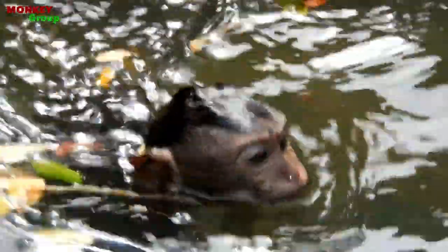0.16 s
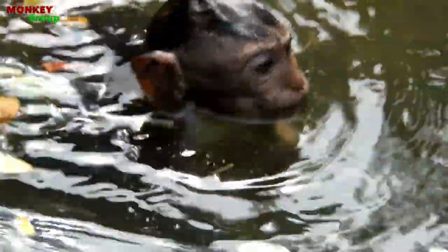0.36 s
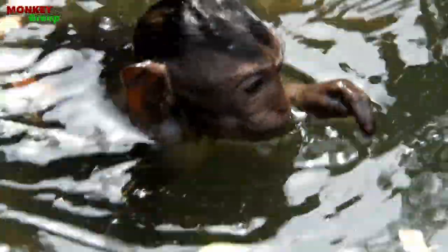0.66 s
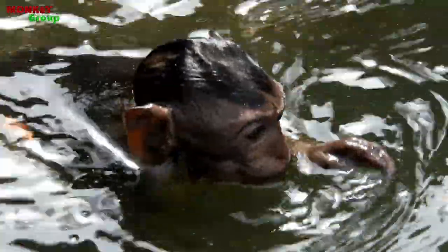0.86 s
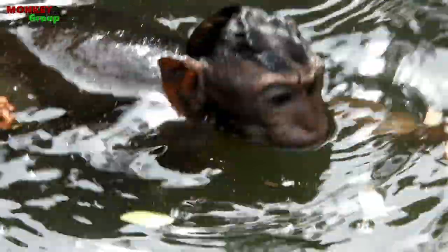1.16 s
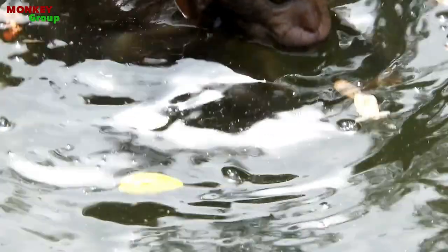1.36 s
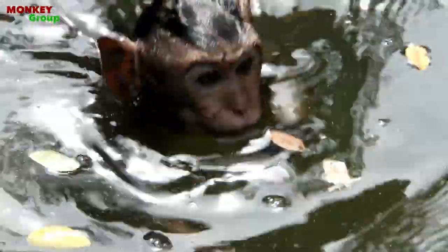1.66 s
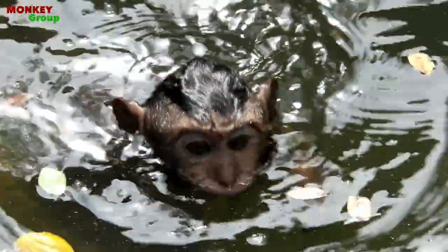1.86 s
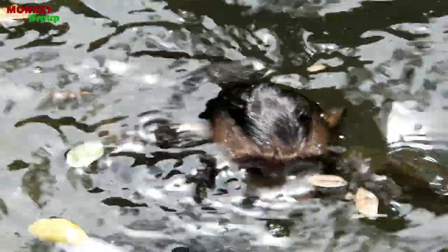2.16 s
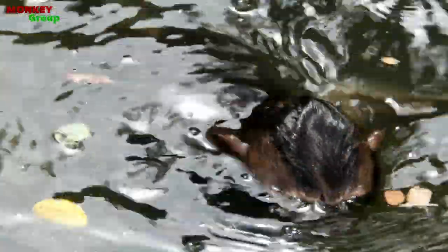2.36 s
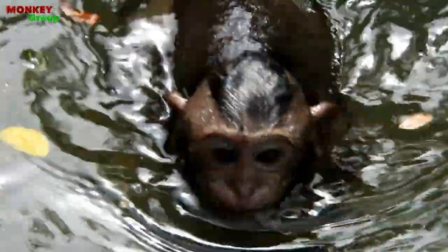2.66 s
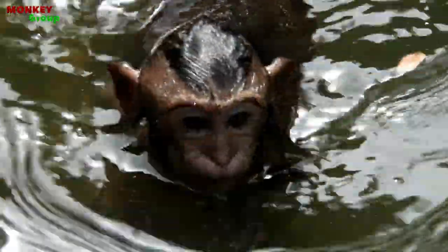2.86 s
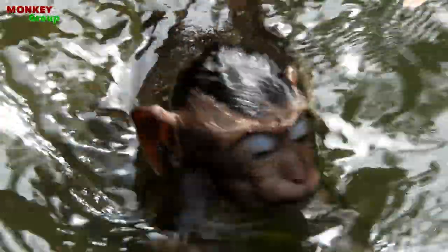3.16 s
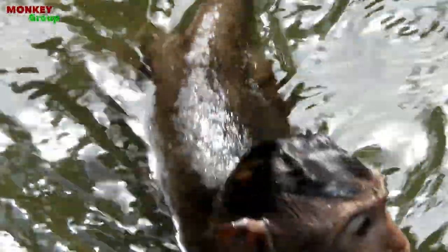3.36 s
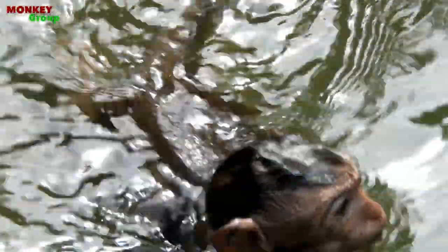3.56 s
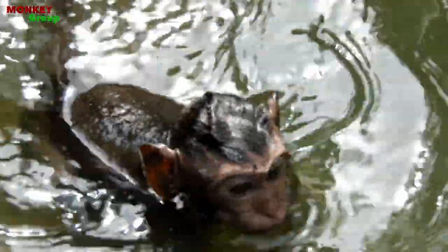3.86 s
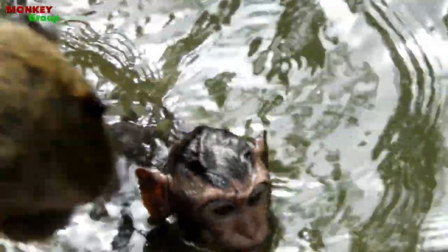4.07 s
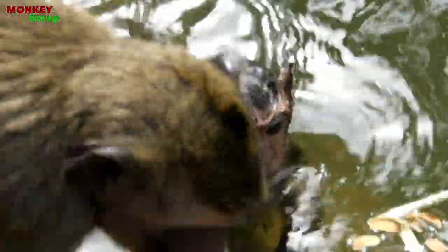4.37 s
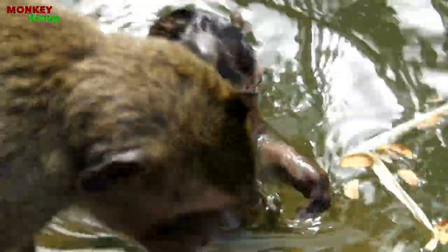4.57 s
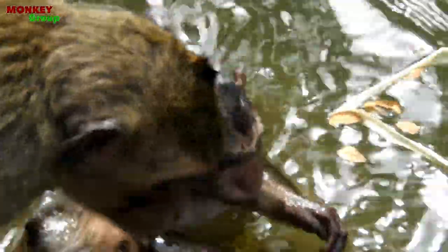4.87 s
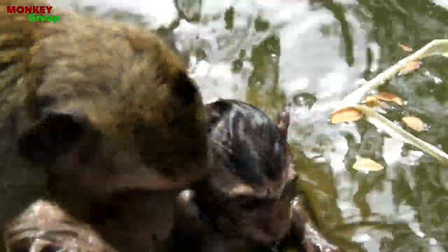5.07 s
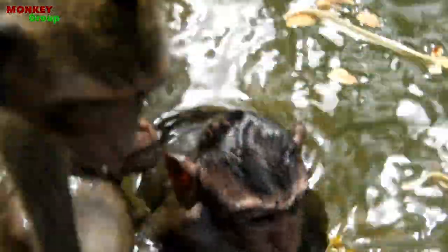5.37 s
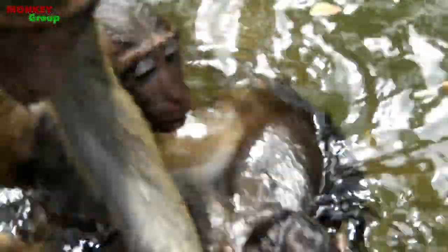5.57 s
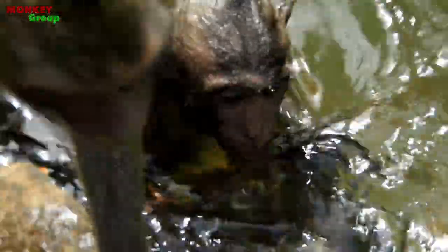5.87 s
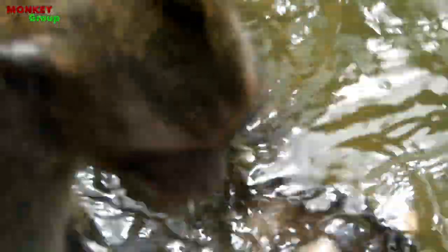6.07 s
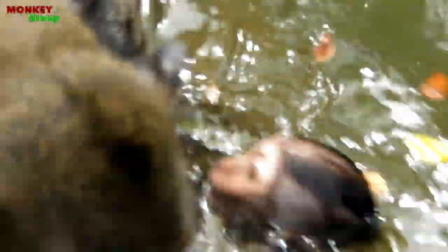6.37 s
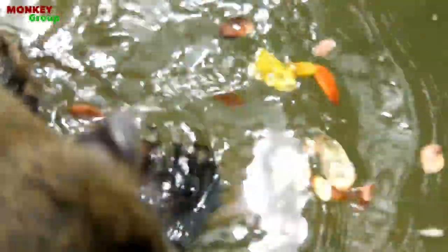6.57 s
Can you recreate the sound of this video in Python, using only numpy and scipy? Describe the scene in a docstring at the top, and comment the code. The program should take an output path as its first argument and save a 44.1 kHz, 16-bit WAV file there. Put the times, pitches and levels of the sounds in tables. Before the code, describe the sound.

A chorus of cicadas drones in the trees for the whole stretch of nearly seven seconds, a high, raspy buzz that throbs unevenly and dominates the sound. Close by and slightly left, a young monkey paddles in a pond, making quiet lapping and scattered small bubbly plops. Something ticks faintly five times a second until about 2.8 seconds. At 1 second a thin, distant bird whistle climbs in short steps. A clearer double plop with a soft dull knock comes at 2.8 seconds, followed by little spits of spray at 3.3 and 4.3 seconds. Another plop at 6.1 seconds leads into the loudest splash, short and sharp, at about 6.35, with drops pattering after it. Far behind, an animal gives soft, brief hoots now and then, most noticeably around 3 and 5 seconds, over a very faint cricket and a low distant rumble.

```python
"""A chorus of cicadas drones in the trees, off to one side, around a pond where monkeys paddle.
Each insect clicks its tymbals at nearly the same rate, so the overtones beat and throb over a rasp.
Close by, water laps, bubbles ring as plops, drops spray and a few dull knocks sound.
Behind lie a distant rumble, a far cricket, one bird whistle and an animal's soft hoots;
for the first three seconds something ticks five times a second."""
import sys
import numpy as np
from scipy import signal
from scipy.io import wavfile
from scipy.ndimage import uniform_filter1d

SR = 44100
rng = np.random.default_rng(int(sys.argv[2]) if len(sys.argv) > 2 else 0)


def log_audio(samples):
    """Write samples as a 16-bit WAV file to the path given in sys.argv[1]."""
    # one column per channel
    frames = np.atleast_2d(samples).T
    # limit to full scale, then quantise
    limited = np.clip(frames, -1, 1)
    pcm = np.round(limited * 32767).astype(np.int16)
    wavfile.write(sys.argv[1], SR, pcm)


N = 296774


def amp(db):
    """dB to gain."""
    return 10 ** (np.asarray(db) / 20)


def rms_one(x):
    """Scale to rms 1."""
    return x / np.sqrt(np.mean(x ** 2) + 1e-20)


def in_time(rows):
    """A fader ride: join (seconds, value) points, one value per sample."""
    return np.interp(np.arange(N) / SR, *np.transpose(rows))


def at_hz(points, hz):
    """Read a spectrum on a log-frequency axis."""
    freqs, values = np.transpose(points)
    return np.interp(np.log(hz), np.log(freqs), values)


def drift(hz):
    """Random modulation of rms 1: noise through a double one-pole low-pass."""
    r = np.exp(-80 * np.pi * hz / SR)
    slow = signal.lfilter([1], [1, -2 * r, r * r], rng.standard_normal(N // 40 + 2002))[2000:]
    return np.interp(np.arange(N) / 40, np.arange(len(slow)), rms_one(slow))


def bandpass(x, edges_hz, order=3):
    """Keep the band between two edges."""
    return signal.sosfilt(signal.butter(order, edges_hz, "band", fs=SR, output="sos"), x)


def ring(clicks, hz, t60):
    """A unit click sets a sine of height 1 ringing."""
    r, w = amp(-60 / (t60 * SR)), 2 * np.pi * hz / SR
    return signal.lfilter([0, np.sin(w)], [1, -2 * r * np.cos(w), r * r], clicks + 1e-18)


def panned(x, left_db):
    """Make the left side louder than the right by left_db."""
    return x * amp([[left_db / 2], [-left_db / 2]])


def add(out, s, sound):
    """Mix a sound in at s seconds."""
    at = min(round(s * SR), N)
    out[..., at:at + sound.shape[-1]] += sound[..., :N - at]


# Stereo image of the noise beds. Each row: frequency in Hz, left-right correlation.
STEREO_LIKENESS = [(30, 0.57), (80, 1), (250, 0.57), (600, 0.41), (2000, 0.32), (4000, 0.079),
                   (8000, -0.33), (11000, -0.74)]

def noise_bands(spectrum, flicker_db, count):
    """Stereo noise bands that flicker partly together: their centres, and bands of total rms 1."""
    edges = np.geomspace(spectrum[0][0], spectrum[-1][0], count + 1)
    centres = np.sqrt(edges[1:] * edges[:-1])
    white, together, bands = rng.standard_normal((2, 2, N)), drift(5.1), []
    for k, hz in enumerate(centres):
        mid, side = bandpass(white[k % 2], edges[k:k + 2], order=2)
        alike = at_hz(STEREO_LIKENESS, hz)
        gain = amp(at_hz(spectrum, hz) + flicker_db * (.5 * together + drift(16.3)))
        bands.append(gain * (np.sqrt(1 + alike) * mid + np.sqrt(1 - alike) * side * [[1], [-1]]))
    return centres, np.array(bands) / np.sqrt(np.mean(np.sum(bands, axis=0) ** 2))


# The rumble's fader ride. Each row: time in seconds, level in dB.
RUMBLE_RIDE = [(0.0, -77), (0.17, -73.5), (2.72, -74), (2.87, -60.5), (3.07, -68.5), (3.97, -75),
               (6.04, -75), (6.13, -69), (6.67, -72.5), (6.73, -88)]
# Its tone. Each row: frequency in Hz, relative noise density in dB.
RUMBLE_SPECTRUM = [(15, -49), (25, -56), (38, -13.5), (86, -0.5), (129, -8.5), (161, -7), (200, -18.5),
                   (281, -14.5), (420, -13), (550, -64), (920, -120)]

def rumble():
    """A distant bed of low noise that swells now and then."""
    _, bands = noise_bands(RUMBLE_SPECTRUM, flicker_db=1, count=8)
    return amp(in_time(RUMBLE_RIDE)) * bands.sum(axis=0)


def cricket(hz=1512, resonance_width_hz=63, level_db=-71):
    """A far, wavering band of insect song: noise rung twice through one resonance."""
    t60 = np.log(1000) / (np.pi * resonance_width_hz)
    band = ring(ring(rng.standard_normal(N), hz, t60), hz, t60)
    return panned(amp(level_db + 2.5 * drift(5)) * rms_one(band), 2.2)


def tree_reverb(x, wet_db, t60):
    """Scattering in the trees adds a dying noise tail, a separate one on each side."""
    t = np.arange(SR // 2) / SR
    tails = rng.standard_normal((2, len(t))) * amp(-60 * t / t60)
    tails /= np.sqrt(np.sum(tails ** 2, axis=1, keepdims=True))
    return x + amp(wet_db) * signal.fftconvolve(x[None], tails, axes=1)[:, :N]


def note(s, length, start_hz, end_hz, level_db, octave_db, rough):
    """A soft-edged gliding tone with a weak octave, unsteady in level and pitch."""
    progress = np.clip((np.arange(N) / SR - s) / length, 0, 1)
    hz = (start_hz + (end_hz - start_hz) * progress) * (1 + .04 * rough * drift(60))
    phase = 2 * np.pi * np.cumsum(hz) / SR
    level = amp(level_db) * np.sin(np.pi * progress) * (1 + rough * drift(71))
    return level * (np.sin(phase) + amp(octave_db) * np.sin(2 * phase))


# The whistle's steps. Each row: start and length in seconds, pitch in Hz, relative level in dB.
BIRD_STEPS = [(1.0, .05, 3240, -48), (1.045, .04, 3460, -50), (1.12, .05, 3540, -48),
              (1.17, .05, 3680, -53), (1.21, .07, 3780, -53), (1.29, .04, 3870, -50)]

def bird():
    """One nearly pure whistle that climbs in short steps."""
    return sum(note(s, length, hz, 1.012 * hz, db - 2, octave_db=-30, rough=.35)
               for s, length, hz, db in BIRD_STEPS)


# Hoot cues. Each row: start and length in seconds, first and last pitch in Hz, relative level in dB.
HOOT_NOTES = [(0.0, 0.048, 780, 790, -63), (0.455, 0.12, 775, 780, -63), (0.933, 0.056, 765, 766, -57),
              (2.679, 0.28, 604, 650, -52), (3.106, 0.074, 632, 620, -46), (4.731, 0.12, 590, 687, -52.5),
              (5.19, 0.06, 777, 774, -52.5), (5.293, 0.041, 730, 714, -55), (5.602, 0.12, 965, 990, -62),
              (6.545, 0.085, 665, 694, -55.5)]

def hoots():
    """An animal's soft, slightly rough calls."""
    return sum(note(*row, octave_db=-14, rough=.4) for row in HOOT_NOTES)


def ticks(first_s=.1365, every_s=.2001, count=14, level_db=-49.5, rustle_t60=.14):
    """Regular pings of one small resonator, each of its own strength, with a brief rustle."""
    clicks = np.zeros(N)
    starts = first_s + every_s * np.arange(count)
    clicks[(starts * SR).astype(int)] = amp(level_db + 2.1 * rng.standard_normal(count))
    decay = signal.lfilter([1], [1, -amp(-60 / (rustle_t60 * SR))], clicks + 1e-18)
    rustle = bandpass(decay * rng.standard_normal(N), [850, 2400])
    return ring(clicks, hz=2150, t60=.05) + amp(-1) * rustle


# Dull knocks. Each row: start in seconds, relative level in dB.
THUD_HITS = [(2.322, -66), (2.812, -60), (2.85, -59), (3.335, -63.5), (6.14, -71.5)]

def thuds(hz=229.6, t60=.14, attack_s=.0052):
    """One low hollow mode, softly struck."""
    out, t = np.zeros(N), np.arange(SR // 3) / SR
    knock = amp(-60 * t / t60) * (1 - np.exp(-t / attack_s)) * np.sin(2 * np.pi * hz * t)
    for s, db in THUD_HITS:
        add(out, s, amp(db + 10.5) * knock)
    return out


# How much the water moves. Each row: time in seconds, relative level in dB.
WATER_RIDE = [(0.0, -70), (0.12, -78), (0.35, -65), (0.55, -73), (0.68, -76.5), (0.96, -74), (1.13, -74),
              (1.28, -69.5), (1.7, -67), (1.85, -76), (2.15, -72), (2.36, -65.5), (2.59, -74), (2.9, -60),
              (3.25, -80), (3.36, -66.5), (3.55, -80), (3.75, -76.5), (4.14, -69.5), (4.33, -65),
              (4.55, -78.5), (4.78, -61.5), (4.96, -76), (5.25, -70.5), (5.45, -79.5), (5.96, -74.5),
              (6.17, -68), (6.3, -50), (6.39, -52.5), (6.45, -57.5), (6.5, -62), (6.6, -64.5), (6.73, -71)]
# The tone of the lapping. Each row: frequency in Hz, relative noise density in dB.
LAPPING_SPECTRUM = [(160, -27), (280, -17), (431, -42), (658, 3.5), (1130, 13), (1500, 18.5), (2060, -27),
                    (2400, -52), (3120, -64), (5280, -120)]

def pond(bubbles_per_s=31):
    """Lapping noise and random small bubbles that ring a few cycles, with a fine fizz on top."""
    lapping = noise_bands(LAPPING_SPECTRUM, flicker_db=4.5, count=10)[1].sum(axis=0)
    strengths = amp(2.5 * np.minimum(rng.exponential(1, N), 4)) * rng.choice([-1, 1], N)
    kicks = strengths * (rng.random(N) < bubbles_per_s / SR)
    pitch_index, bubbles = rng.integers(0, 14, N), np.zeros(N)
    for k, hz in enumerate(np.geomspace(750, 2000, 14)):
        pings = ring(kicks * (pitch_index == k), hz, t60=30 / hz) * 1000 / hz
        bubbles += ring(pings, hz, t60=12 / hz)   # rounds the attack
    fizz = bandpass(rng.standard_normal((2, N)), [4600, 10800], order=5)
    fizz *= amp(8 + 4 * drift(40))
    return amp(in_time(WATER_RIDE)) * (amp(6) * lapping + amp(-9.5) * panned(rms_one(bubbles), 2.5) + fizz)


def faint_plops(count=14):
    """Cue rows for small plops at random moments, louder when the water moves."""
    when, softer, big, small, balance = rng.random((count, 5)).T
    starts = (np.arange(count) + when) * N / SR / count
    db = in_time(WATER_RIDE)[(starts * SR).astype(int)] + 12 - 6 * softer
    return list(zip(starts, db, 800 + 450 * big, 1450 + 800 * small, -15 * balance, [.035] * count))


# Plop cues. Each row: time in seconds, relative level in dB, big and small bubble pitch in Hz,
# small bubble against big in dB, ring time in seconds.
PLOP_HITS = [(0.055, -54.5, 910, 2170, -16, 0.047), (0.259, -55, 940, 1230, -12, 0.043),
             (0.351, -56, 1240, 1520, -20, 0.025), (0.451, -55.5, 940, 1210, 2, 0.046),
             (0.533, -55.5, 1104, 2020, -8.5, 0.042), (0.865, -68, 940, 1500, -15, 0.023),
             (1.067, -53, 923, 1094, 2, 0.034), (1.235, -53.5, 810, 1220, 4.5, 0.027),
             (1.248, -50.5, 940, 2160, -7, 0.043), (1.447, -53, 960, 2300, -7.5, 0.026),
             (1.795, -52.5, 1065, 2040, -20, 0.03), (1.936, -48.5, 1126, 2160, -9.5, 0.034),
             (2.309, -48, 1070, 1500, -10, 0.031), (2.338, -56, 1080, 1440, 2, 0.036),
             (2.81, -32, 1008, 1450, -11, 0.036), (2.847, -30.5, 1056, 1515, -9.5, 0.024),
             (3.322, -44, 1764, 2140, 1, 0.032), (3.333, -55, 1240, 1540, 8, 0.032),
             (4.131, -43.5, 1260, 986, -4, 0.031), (4.143, -48, 944, 1270, -8, 0.028),
             (4.3, -41, 1190, 1840, 9, 0.012), (5.234, -49, 770, 1020, -12.5, 0.071),
             (5.347, -59, 1000, 1190, -2, 0.043), (6.118, -37.5, 1255, 1610, -2, 0.024),
             (6.131, -42, 1285, 1540, -7, 0.036), (6.274, -49.5, 1050, 1580, 5, 0.025),
             (6.297, -58, 1140, 1710, 14, .03), (6.324, -48.5, 1160, 1660, 8, .025),
             (6.3549, -16.5, 1035, 1590, 2, 0.024), (6.443, -52.5, 1260, 1470, 14, 0.037)]

def plops(slap_db=8, gurgle_gap_s=.014):
    """Two bubbles rising in pitch and a slap of dull noise swell within a few ms; three gurgles follow."""
    out, t = np.zeros((2, N)), np.arange(SR // 10) / SR
    rising = 2 * np.pi * (t + 1.5 * t ** 2)
    for s, db, big_hz, small_hz, small_db, t60 in PLOP_HITS + faint_plops():
        slap_hz = [.72 * min(big_hz, small_hz), max(1.35 * big_hz, 1.2 * small_hz * (small_db > -9))]
        attack_s = t60 * (.08 + .0045 * (-15 - db))   # weaker plops swell more slowly
        envelope = amp(-60 * t / t60) * (1 - np.exp(-t / attack_s)) ** 2
        envelope /= envelope.max()
        onset_s = s + .005 - t[envelope.argmax()]
        for k, (late, lower, weaker) in enumerate(rng.random((4, 3))):
            phase, delay_s, under_db = rising, 0, 0
            if k > 0:   # gurgles come later, lower and softer than the plop
                phase = rising * (1 - .15 * lower)
                delay_s = .006 + gurgle_gap_s * (k - 1 + late)
                under_db = 11 + .3 * (db + 62) + 8 * weaker
            bubbles = np.sin(big_hz * phase) + amp(small_db) * np.sin(small_hz * phase)
            slap = amp(slap_db) * bandpass(rng.standard_normal(len(t)), slap_hz)
            plop = amp(db - 3 - under_db) * envelope * (bubbles + slap)
            add(out, onset_s + delay_s, panned(plop, 4.9))
    return signal.sosfilt(signal.butter(3, 560, "high", fs=SR, output="sos"), out)


# Splash cues. Each row: start in seconds, relative level in dB, band centre in Hz.
SPRAY_HITS = [(3.331, -36, 4250), (4.312, -44, 4350), (6.12, -40, 4400), (6.306, -32, 4600),
              (6.335, -33, 4270), (6.357, -21, 3440), (6.368, -33, 3680), (6.385, -44, 9500),
              (6.41, -43, 9800), (6.435, -43, 9400), (6.46, -44, 9900)]

def sprays(t60=.022, attack_s=.0035):
    """Short puffs of bright noise where drops fly."""
    out, t = np.zeros(N), np.arange(SR // 10) / SR
    envelope = amp(-60 * t / t60) * (1 - np.exp(-t / attack_s))
    for s, db, hz in SPRAY_HITS:
        puff = bandpass(envelope * rng.standard_normal(len(t)), [hz / 1.14, hz * 1.14])
        add(out, s, amp(db + 18) * puff)
    return out


# The grit between the cicadas' overtones. Each row: frequency in Hz, relative noise density in dB.
RASP_SPECTRUM = [(1800, -18), (2550, 5), (2900, -1), (3600, -10), (4020, -13.5), (4270, 8), (4750, -19.5),
                 (5150, 1), (5700, -1), (6800, -2.5), (7900, -4.5), (8500, 8), (9800, -3), (10500, -3.5),
                 (11300, 10.5), (12200, 14)]

def cicada_rasp(fifth_db, weak_db, high_db, top_db, level_db=-42.5):
    """Noise bands that swell with the nearby overtones, but less deeply."""
    rasp = np.zeros((2, N))
    for hz, band in zip(*noise_bands(RASP_SPECTRUM, flicker_db=4.6, count=24)):
        ride_db = fifth_db if hz < 3000 else weak_db if hz < 7000 else high_db if hz < 8800 else top_db
        rasp += amp(level_db + .28 * (ride_db - np.mean(ride_db))) * band
    return signal.sosfilt(signal.cheby2(10, 50, 12168, fs=SR, output="sos"), rasp)


def swells_db(peaks, rise_db_per_s, fall_db_per_s):
    """Uneven swells: the level climbs to each peak and sinks away from it."""
    t = np.arange(N) / SR
    swells = [db - np.where(t < s, rise_db_per_s * (s - t), fall_db_per_s * (t - s)) for s, db in peaks]
    return np.max(swells, axis=0)


CLICK_HZ, INSECTS = 541.46, 7   # tymbal clicks per second, size of the chorus

def tymbals(overtones, levels_db, cycles, gains, lag_us, spread_us, left_db):
    """Every insect repeats a click shape of its own, with its own tiny delay from left to right."""
    turn, out = np.linspace(0, 1, 2049), np.zeros((2, N))
    lags_s = 1e-6 * (lag_us + spread_us * np.cos(2.4 * np.arange(INSECTS)))
    for cycle, lag, gain in zip(cycles, lags_s, gains):
        phases = np.outer(turn, overtones) + rng.random(len(overtones))
        shape = np.sin(2 * np.pi * phases) @ amp(levels_db)
        out[0] += gain * np.interp(cycle % 1, turn, shape)
        out[1] += gain * np.interp((cycle - CLICK_HZ * lag) % 1, turn, shape)
    power = uniform_filter1d(np.mean(out ** 2, axis=0), size=int(.12 * SR))
    return panned(out / np.sqrt(power), left_db)   # evens out the slow beating


# Fader rides of the fifth and tenth overtones. Each row: time in seconds, level in dB.
FIFTH_RIDE = [(0.0, -47), (0.09, -36.5), (0.2, -56.5), (0.26, -35.5), (0.37, -58.5), (0.47, -32.5),
              (0.65, -40), (0.86, -29.5), (0.9, -39.5), (0.96, -26), (1.05, -48), (1.08, -35),
              (1.18, -45.5), (1.46, -28), (1.69, -49.5), (1.95, -49.5), (1.99, -35), (2.13, -42.5),
              (2.21, -27.5), (2.32, -45), (2.59, -57.5), (2.62, -38.5), (2.89, -59), (2.98, -36),
              (3.02, -55), (3.2, -35), (3.34, -57), (3.39, -25), (3.45, -39), (3.56, -47), (3.75, -36),
              (3.82, -62), (3.9, -45.5), (4.11, -49.5), (4.23, -34), (4.38, -56), (4.48, -44), (5.1, -42.5),
              (5.17, -56), (5.53, -49.5), (5.55, -36.5), (5.79, -43.5), (5.9, -30), (6.0, -50), (6.11, -30),
              (6.32, -42), (6.35, -30.5), (6.71, -48.5), (6.73, -63)]
TENTH_RIDE = [(0.0, -40), (0.17, -30), (0.28, -36.5), (0.32, -29.5), (0.41, -44.5), (0.52, -33),
              (1.89, -33), (1.93, -27.5), (2.15, -34.5), (2.47, -31), (2.66, -39.5), (2.72, -26.5),
              (2.89, -37.5), (3.07, -31), (3.17, -43), (3.24, -29), (3.62, -46), (3.77, -36), (4.42, -40),
              (4.48, -28), (4.61, -43), (4.93, -32), (5.4, -40.5), (5.6, -30.5), (5.71, -41), (5.92, -27),
              (6.28, -44), (6.33, -30), (6.67, -36), (6.73, -45)]
# Throbs of the high and top overtone groups. Each row: time of the peak in seconds, level in dB.
HIGH_PEAKS = [(.07, -30), (.42, -32), (.61, -34.5), (.86, -28.5), (1.1, -36.5), (1.31, -32.5), (1.7, -27),
              (1.85, -32), (2.13, -30), (2.34, -38), (2.64, -28), (2.83, -38.5), (3.04, -28.5), (3.3, -37),
              (3.49, -33), (3.68, -37.5), (3.96, -35.5), (4.4, -32.5), (4.84, -30), (5.18, -34),
              (5.28, -29.5), (5.77, -27.5), (6.22, -29.5), (6.48, -39.5), (6.72, -29.5)]
TOP_PEAKS = [(.07, -48.5), (.39, -45), (.61, -48), (.86, -46), (1.12, -55.5), (1.33, -46), (1.66, -49),
             (1.73, -45.5), (2.16, -44), (2.36, -57), (2.64, -42), (3.12, -44.5), (3.33, -54.5),
             (3.68, -55.5), (3.98, -53), (4.16, -54), (4.41, -54), (4.68, -48), (4.82, -50.5),
             (5.19, -46.5), (5.35, -51), (5.71, -46), (6.2, -47.5), (6.71, -47)]
# Voicing of each group, as two lists: multiples of the click rate, then their balance in dB.
WEAK_OVERTONES = [6, 7, 8, 9, 11, 12, 13]
WEAK_MIX_DB = [-17, -23, -16, -6, 0, -10, -9]
HIGH_OVERTONES = [14, 15, 16, 17, 18]
HIGH_MIX_DB = [-27, -9, -27, -41, -36.5]
TOP_OVERTONES = [19, 20, 22, 25]
TOP_MIX_DB = [-20, 0, -21, -27]

def cicadas(pulses_per_s=17, pulse_db=10, flutter_hz=16):
    """Click rates lie close together and wander, so each overtone is a beating band, wider higher up."""
    detunes = np.linspace(-1, 1, INSECTS)
    cycles = [np.cumsum(CLICK_HZ + 4.1 * d + 1.3 * drift(7) + 1.2 * drift(40)) / SR for d in detunes]
    # each insect swells by itself, and uneven clicks spread a skirt of noise around every overtone
    swell = np.array([drift(8) for _ in detunes])
    uneven = np.array([drift(220) for _ in detunes])
    off_centre = detunes[:, None] ** 2
    gains = amp(-7 * off_centre + 3 * swell) * (1 + .2 * uneven)
    lead_gains = amp(-22 * off_centre + 3 * swell) * (1 + .09 * uneven)   # a few insects carry the fifth

    pulses = np.sin(np.pi * np.cumsum(pulses_per_s * (1 + .3 * drift(3))) / SR) ** 2
    fifth_db = in_time(FIFTH_RIDE) + pulse_db * (pulses - .75) + 2 * drift(flutter_hz)
    tenth_db = in_time(TENTH_RIDE) + 2 * drift(flutter_hz)
    weak_db = uniform_filter1d(in_time(TENTH_RIDE), size=SR // 2) - 15.5   # the tenth's slow trend
    high_db = swells_db(HIGH_PEAKS, rise_db_per_s=108.5, fall_db_per_s=84) + 2.2 * drift(flutter_hz)
    top_db = swells_db(TOP_PEAKS, rise_db_per_s=160, fall_db_per_s=116)

    out = amp(fifth_db) * tymbals([5], [0], cycles, lead_gains, lag_us=12, spread_us=50, left_db=3.8)
    out += amp(tenth_db) * tymbals([10], [0], cycles, gains, lag_us=27, spread_us=40, left_db=.4)
    weak_gain = amp(weak_db + 3.42 * drift(9.4))
    out += weak_gain * tymbals(WEAK_OVERTONES, WEAK_MIX_DB, cycles, gains, 27, 40, .17)
    out += amp(high_db) * tymbals(HIGH_OVERTONES, HIGH_MIX_DB, cycles, gains, 42, 35, -1.2)
    out += amp(top_db) * tymbals(TOP_OVERTONES, TOP_MIX_DB, cycles, gains, 42, 35, -1.2)
    return out + cicada_rasp(fifth_db, weak_db, high_db, top_db)


def scene():
    """The stereo mix: cicadas, close water to the left, and far calls among the trees."""
    whistle, calls, bed = bird(), hoots(), rumble()
    water = pond() + plops() + panned(sprays(), 3.5) + panned(thuds(), 6.2)
    mix = cicadas() + water + panned(ticks(), 3.5) + cricket() + bed
    mix += tree_reverb(whistle, wet_db=5, t60=.92)
    return mix + amp(-8.5) * tree_reverb(calls, wet_db=-1.3, t60=.18)


def record(dry):
    """A steep low-pass shuts off the air above 15.2 kHz."""
    return signal.sosfilt(signal.cheby2(12, 70, 15200, fs=SR, output="sos"), dry)


dry = scene()
out = record(dry)
log_audio(out)
```